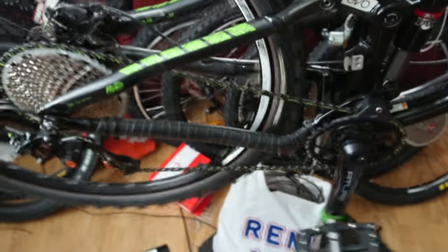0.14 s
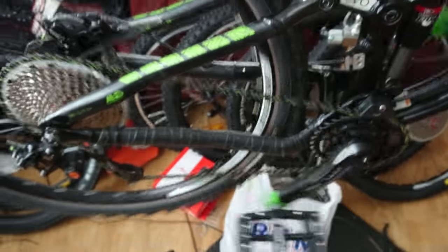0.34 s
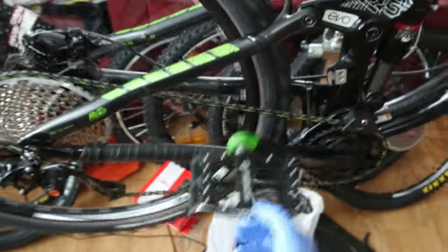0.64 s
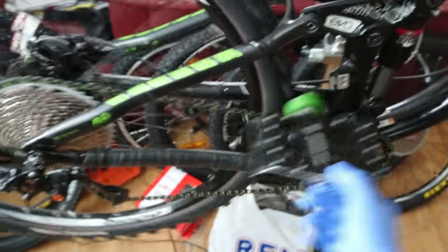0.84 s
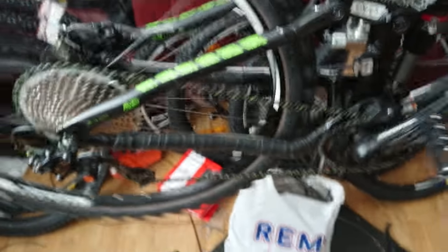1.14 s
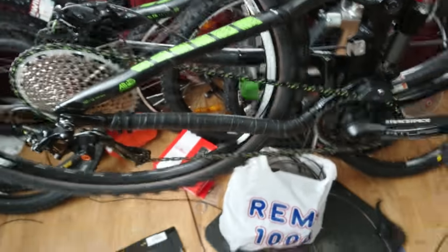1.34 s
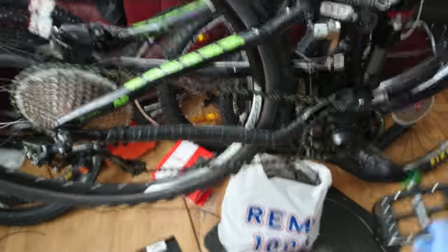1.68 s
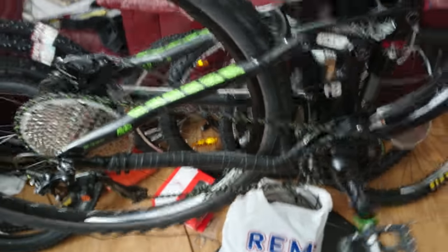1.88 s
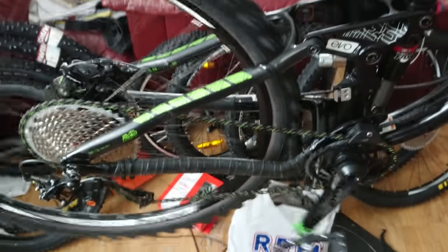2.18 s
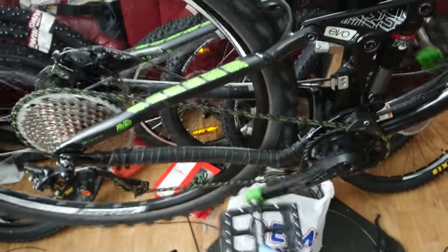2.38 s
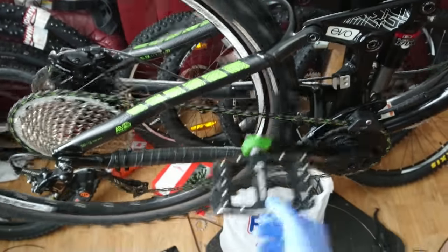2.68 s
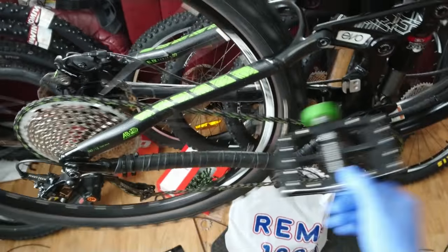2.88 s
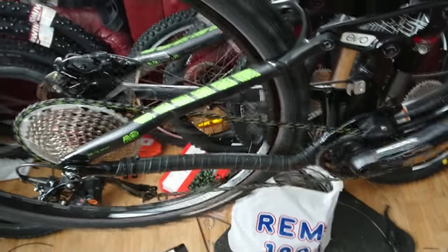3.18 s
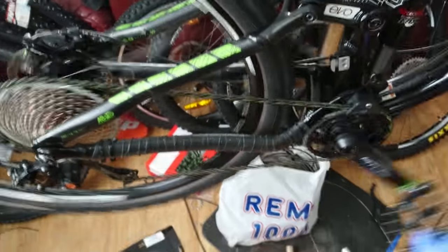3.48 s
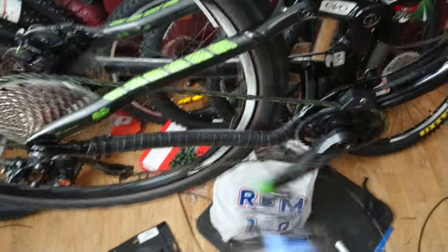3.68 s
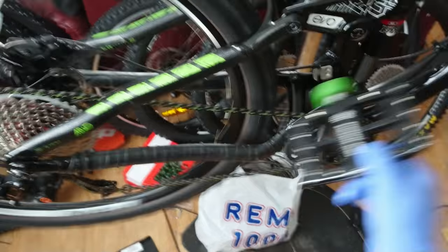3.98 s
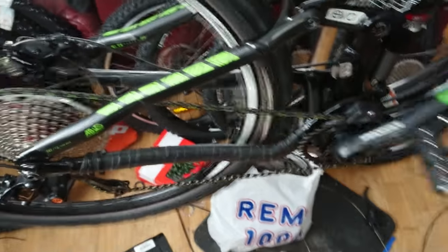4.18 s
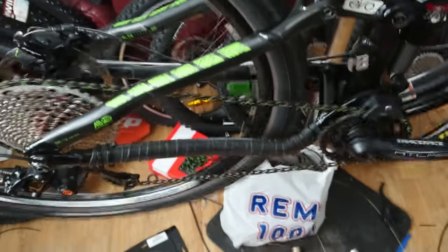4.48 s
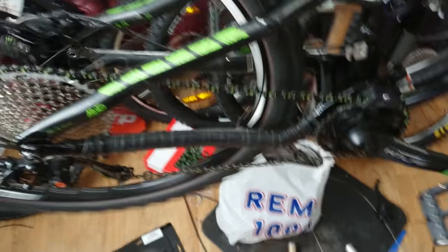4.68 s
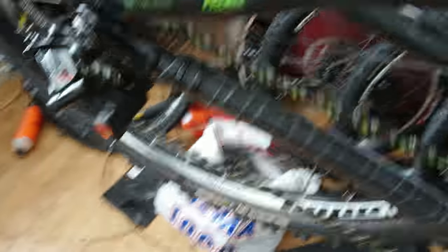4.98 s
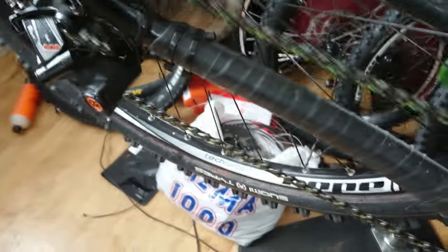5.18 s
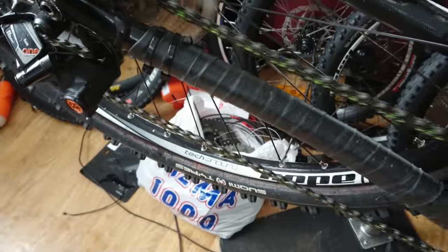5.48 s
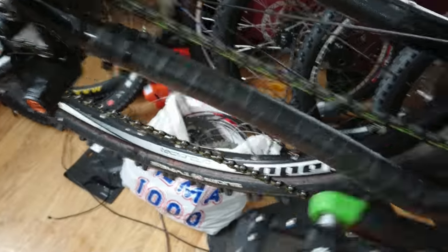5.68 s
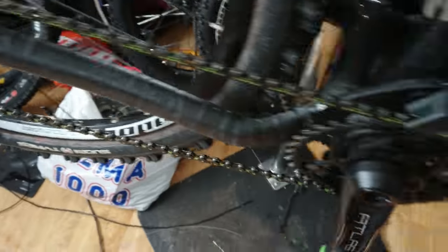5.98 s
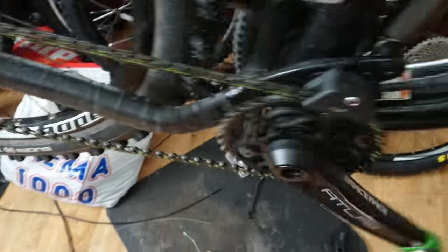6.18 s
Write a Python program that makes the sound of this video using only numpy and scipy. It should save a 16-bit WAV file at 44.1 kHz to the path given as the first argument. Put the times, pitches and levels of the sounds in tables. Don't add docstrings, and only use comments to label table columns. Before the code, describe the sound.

A bicycle freehub clicks as the crank is turned backwards by hand, quickening to a sharp rattle, then a loud close-up ratcheting buzz that squeaks and scrapes.

```python
import sys
import numpy as np
from scipy import signal
from scipy.fft import rfft, irfft
from scipy.io import wavfile
from scipy.ndimage import uniform_filter1d

SR = 44100
rng = np.random.default_rng(int(sys.argv[2]) if len(sys.argv) > 2 else 0)


def transcribe(signal):
    frames = np.atleast_2d(signal).T
    limited = np.clip(frames, -1, 1)
    pcm = np.round(limited * 32767).astype(np.int16)
    wavfile.write(sys.argv[1], SR, pcm)


def volts_from_db(level):
    exponent = np.asarray(level, float) / 20
    return 10 ** exponent


N = 279594
TIME = np.arange(N) / SR
BEFORE = TIME < 4.797

# start_s, peak_db
FIRM_SNAPS = [(0.0518, -46), (0.1876, -47.5), (0.306, -41.5), (.4045, -37.5), (0.4967, -32.5),
              (0.5748, -37.5), (.6769, -41.5), (0.7785, -43), (0.893, -44), (0.997, -33), (1.1049, -40),
              (1.2087, -44), (1.318, -42.5), (1.4316, -44), (1.543, -44.5), (1.6576, -44), (1.8054, -52.5),
              (1.955, -47), (2.1032, -43), (2.2348, -49), (2.3475, -47), (2.457, -40.5),
              (2.5745, -49), (2.6983, -44.5), (2.815, -46), (2.9223, -45), (3.027, -41), (3.1228, -37.5),
              (3.2106, -38.5), (3.2924, -37), (3.3667, -39), (3.4281, -41), (3.4885, -31.5), (3.5423, -38),
              (3.5942, -35.5), (3.6431, -43), (3.693, -29.5), (3.7409, -31), (3.7873, -33.5), (3.8342, -33),
              (3.8781, -31), (3.9249, -42), (3.9749, -31.5)]
FIRM = FIRM_SNAPS
# start_s, peak_db
NEAR_SNAPS = [(4.0518, -23.5), (4.1075, -24), (4.155, -25.5), (4.198, -24), (4.2408, -25), (4.2833, -24),
              (4.325, -23.5), (4.3677, -22.5), (4.4075, -21), (4.4496, -24), (4.4897, -23), (4.5331, -23.5),
              (4.5752, -24), (4.619, -23), (4.6634, -25), (4.7053, -21.5), (4.7453, -21.5)]
# freq_hz, density_db_per_hz
FAR = [(530, -40.5), (900, -17.5), (1280, -17.5), (1640, -9.5), (1880, -14.5), (2190, -7.5), (2790, -9),
       (3470, -6), (4150, 0.5), (7860, -21), (9420, -8.5), (11600, -24.5), (15100, -11), (16000, -14.5)]
# freq_hz, left_minus_right_db
FAR_LR = [(1200, -4), (2400, 4), (4400, 5.5), (6800, 16), (9300, -8), (12000, -6), (15000, 3.5)]
# freq_hz, density_db_per_hz
CLOSE = [(530, -34.5), (900, -22), (1130, -25.5), (1790, -16), (1990, -14), (2300, -13), (2790, -3.5),
         (3730, -7), (4570, -3.5), (7680, -18.5), (9200, -10.5), (11600, -21.5), (15100, -6), (16000, -11)]
# freq_hz, left_minus_right_db
CLOSE_LR = [(1200, -4), (2400, -12), (4400, -5.5), (6800, 11), (9300, -10.5), (12000, -2.5), (15000, 3.5)]


def far_pawls():
    notes_hz = [3960, 4730, 4260]
    return ratchet(far_snaps(), FAR, FAR_LR, notes_hz, ping_db=4.5, ping_t60_s=0.006,
                   gain_db=-5.5, snap_t60_s=0.0029, early_db=-4.0, early_s=0.001508,
                   tail_db=-11.0, tail_t60_s=0.3, treble_t60_s=0.092, scatter_db=0.34)


def far_snaps():
    # start_s, peak_db
    link_ticks = [(.1685, -53), (.2713, -45), (.594, -56), (.6978, -57), (.9228, -47), (1.1338, -41.5),
                  (1.294, -50), (1.6871, -36), (2.4259, -51), (2.7187, -63)]
    # start_s, peak_db
    hard_teeth = [(.9492, -41.5), (1.8771, -49), (2.9746, -39.5), (3.7179, -36), (3.8107, -35),
                  (3.901, -31.5), (4.0043, -30)]
    teeth = alternate(FIRM, 0.49, soft_db=-6.5, scatter_db=2.0)
    return np.vstack([voiced(teeth, -22.0, -0.27, 5.9, 0.067),
                      voiced(link_ticks, -17.0, -0.072, 3.9, 0.12),
                      voiced(hard_teeth, -22.0, -0.1, 5.1, 0.1)])


def near_pawls():
    # freq_hz, density_db_per_hz
    body = [(530, -46), (900, -15.5), (1150, -21.5), (1920, -7), (2300, -15.5), (2890, 1), (3820, -1),
            (4360, 1), (6800, -4), (8050, -12.5), (9310, -1), (11600, -11.5), (15100, -0.5), (16000, 3)]
    # freq_hz, left_minus_right_db
    balance = [(1200, -2), (2400, 3), (4400, 3.5), (6800, 12), (9300, -3), (12000, -3.5), (15000, 3.5)]
    notes_hz = [3260, 4100, 5800]
    snaps = voiced(NEAR_SNAPS, -11.5, -1.7, 7.4, -0.5)
    return ratchet(snaps, body, balance, notes_hz, ping_db=-6.0, ping_t60_s=0.0057,
                   gain_db=0, snap_t60_s=0.009, early_db=-1.1, early_s=0.0023,
                   tail_db=-10, tail_t60_s=0.32, treble_t60_s=0.2, scatter_db=0.71)


def close_pawls():
    notes_hz = [2785, 3100, 4590, 5400]
    buzz = ratchet(spinning(), CLOSE, CLOSE_LR, notes_hz, ping_db=-3.5, ping_t60_s=0.0094,
                   gain_db=-1.76, snap_t60_s=0.011, early_db=-16.0, early_s=0.001,
                   tail_db=-9, tail_t60_s=0.22, treble_t60_s=0.16, scatter_db=2.14)
    return hub_rings(buzz)


def spinning():
    # start_s, peak_db
    kick_start = [(4.9083, -27.5), (4.9431, -26), (4.9651, -22.5), (4.9821, -19), (4.9982, -24),
                  (5.0114, -16.5), (5.0247, -21), (5.0370, -16.5)]
    # start_s, peak_db
    kick_firm = [(5.049, -15.5), (5.0724, -20), (5.0908, -14.5), (5.1084, -18), (5.1266, -12.5),
                 (5.1428, -16.5), (5.1577, -11.5), (5.1738, -13), (5.1857, -14), (5.1984, -15)]
    # start_s, teeth_per_s, level_db
    spin = [(5.2, 157, -24.5), (5.258, 171, -24), (5.339, 157, -24), (5.438, 142, -24), (5.662, 128, -23.5),
            (5.762, 126, -26), (5.854, 111, -24.5), (6.039, 97, -26.5), (6.34, 97.7, -27.5)]
    s, rate, db = np.transpose(spin)
    teeth = np.cumsum(np.interp(TIME, s, rate) * (TIME > kick_firm[-1][0])) / SR
    when = TIME[1:][np.diff(np.floor(teeth)) > 0]
    jitter_s = 0.0001 * rng.standard_normal(N // 100)[:len(when)]
    when = np.clip(when + jitter_s, 0, TIME[-1])
    peak_db = np.interp(when, s, db + 7.5 - 10 * np.log10(rate / 130))
    limp_db = 0.5 * (-1.) ** np.arange(len(when))
    wobble_db = 2.5 * walk(25)[(when * SR).astype(int)]
    peak_db = peak_db + limp_db + wobble_db
    kick = np.vstack([kick_start, alternate(kick_firm, 0.55, soft_db=-2.1, scatter_db=1.2)])
    kick = voiced(kick, -9.5, -0.35, -8.0, 0.69)
    treble_db, pan_db = np.full(len(when), -7.5), np.full(len(when), -6.5)
    return np.vstack([kick, np.transpose([when, peak_db, treble_db, pan_db])])


def hub_rings(close):
    # freq_hz, width_hz, gain_db
    modes = [(2018, 18, 2.5), (2430, 14, -4.5), (2724, 49, -3), (2870, 9, 6), (3030, 10, -4),
             (3130, 21, 0.5), (4720, 37, -6.5), (4570, 33, -4.5)]
    # centre_s, level_db, length_s
    squeaks = [(5.2, -22, .03), (5.338, -12, 0.033), (5.7, -2.5, 0.089), (5.8, 6.5, 0.029)]
    # centre_s, level_db, length_s
    scrapes = [(5.92, 4.9, 0.032), (6.1, 9.9, 0.082), (6.3, 2.42, 0.072)]
    shell = sum(volts_from_db(db + 3.5 + 3.4 * walk(12)) * ring(close, hz, width) for hz, width, db in modes)
    squeak = bumps(squeaks) * ring(close, 5340, 598)
    scrape = bumps(scrapes) * ring(ring(close, 2840, 69.9), 2840, 70)
    return close + shell + squeak + scrape


def ratchet(snaps, body, balance, notes_hz, ping_db, ping_t60_s, gain_db, snap_t60_s, early_db, early_s,
            tail_db, tail_t60_s, treble_t60_s, scatter_db):
    s, db, treble_db, pan_db = np.transpose(snaps)
    chance = rng.standard_normal((len(s), 4)).T
    late = s + early_s * np.abs(1 + 0.34 * chance[1])
    at = (s * SR).astype(int)
    late_at = np.minimum(late * SR, N - 1).astype(int)
    ping = pings(late, db + ping_db, notes_hz, ping_t60_s)
    bass, treble = [signal.butter(4, 8000, kind, fs=SR, output="sos") for kind in ("low", "high")]
    bands = ((bass, 0, tail_t60_s), (treble, treble_db - treble_db.mean(), treble_t60_s))
    cracks, tails, out = pair(0.27), pair(0.1), []
    for ear, side in enumerate((1, -1)):
        sound = 0
        ear_db = scatter_db * chance[2 + ear]
        for sos, shift_db, t60 in bands:
            kick_db = db + gain_db + shift_db + side * (pan_db - pan_db.mean()) / 2
            kicks, hard = np.zeros(N), np.zeros(N)
            np.add.at(kicks, at, volts_from_db(2 * kick_db - 0.5 * (db - db.mean())))
            np.add.at(hard, at, volts_from_db(2 * (kick_db + early_db + 2 * scatter_db * chance[0])))
            np.add.at(hard, late_at, volts_from_db(2 * (kick_db + ear_db)))
            crack = fading(hard, snap_t60_s) * cracks[ear]
            decay = np.hypot(fading(kicks, t60), volts_from_db(-0.5) * fading(kicks, t60 / 5))
            tail = volts_from_db(tail_db) * decay * tails[ear]
            sound = sound + signal.sosfilt(sos, crack + tail)
        sound = colour(sound, body, balance, side) + ping(side * pan_db / 2 + ear_db)
        lag = 11 * (1 - ear)
        out.append(np.pad(sound, (lag, 0))[:N])
    return np.array(out)


def pings(when, db, notes_hz, t60_s):
    chance = rng.random((len(when), 2)).T
    hz = np.array(notes_hz)[(chance[0] * len(notes_hz)).astype(int)]
    hz = hz * (1 + 0.12 * (chance[1] - 0.5))
    age = np.arange(int(0.012 * SR)) / SR
    rise = 1 - np.exp(-age / 0.0003)
    shape = np.sin(2 * np.pi * hz[:, None] * age) * volts_from_db(-60 * age / t60_s) * rise
    at = (when * SR).astype(int)[:, None] + np.arange(len(age))

    def render(shift_db):
        rung = volts_from_db(db + shift_db)[:, None] * shape
        return np.bincount(at.ravel(), rung.ravel(), 2 * N)[:N]
    return render


def alternate(firm, share, soft_db, scatter_db):
    s, db = np.transpose(firm)
    soft = (db[1:] + db[:-1]) / 2 + soft_db + scatter_db * rng.standard_normal(len(s) - 1)
    rows = np.vstack([firm, np.transpose([s[:-1] + share * np.diff(s), soft])])
    return rows[np.argsort(rows[:, 0])]


def voiced(rows, treble_db, treble_slope, pan_db, pan_slope):
    s, db = np.transpose(rows)
    above = db - uniform_filter1d(db, size=7)
    chance = rng.standard_normal((len(s), 2)).T
    treble = treble_db + treble_slope * above + 1.5 * chance[0]
    pan = pan_db + pan_slope * above + 1.5 * chance[1]
    return np.transpose([s, db, treble, pan])


def efforts():
    # start_s, level_db
    push = [(0.0, -72), (.44, -63), (.83, -64), (1.34, -66), (1.8, -73), (2.46, -70), (2.94, -68),
            (3.28, -64), (3.61, -59), (3.99, -54.5), (4.11, -63), (4.4, -66.5), (4.75, -71), (4.9, -75.5),
            (5.08, -66), (5.25, -54.5), (6.1, -59.5), (6.34, -60.5)]
    # centre_s, rumble_db, length_s
    grips = [(.4, -62.5, 0.34), (1.17, -70.5, 0.36), (1.52, -65, 0.16), (2.2, -75.5, 0.82),
             (3.65, -67, 0.14), (3.97, -69, 0.087), (4.25, -68, 0.045), (4.5, -71.5, 0.17),
             (5.0, -68, 0.064)]
    push_db = np.interp(TIME, *np.transpose(push))
    firm, near = np.array(FIRM)[:, 0], np.array(NEAR_SNAPS)[:, 0]
    teeth_per_s = np.r_[2 / np.diff(firm), 1 / np.diff(near)]
    speed = np.interp(TIME, np.r_[firm[1:], near[1:]], teeth_per_s)
    far_db = -60 + 2.44 * 20 * np.log10(speed / 18) + 11.5 * (TIME > 4.05)
    close_db = -26.5 + 2.05 * (push_db + 57.5)
    crunch_db = np.where(BEFORE, far_db, close_db)
    rumble = bumps(grips) + np.where(BEFORE, volts_from_db(-80), volts_from_db(push_db + 2))
    return crunch_db, push_db, 20 * np.log10(rumble)


def chain(crunch_db, drum_db):
    # freq_hz, width_hz, gain_db
    tubes = [(385, 50, -11), (464, 21, -11), (645, 7.1, 10), (890, 240, -20)]
    crunch = fading(grit(900, 1.3) ** 2, 0.036) * pair(0.082)

    def heard(body, balance, level_db):
        left = colour(crunch[0], body, balance, 0.74)
        right = colour(crunch[1], body, balance, -1.5)
        return level(np.array([left, right]), level_db)
    crunch = np.where(BEFORE, heard(FAR, FAR_LR, -6), heard(CLOSE, CLOSE_LR, -9))
    jolts = fading(grit(300, 0.59) ** 2, 0.071) * pair(0.35)
    drum = sum(volts_from_db(db) * ring(jolts, hz, width) for hz, width, db in tubes)
    drum = drum + volts_from_db(2) * ring(ring(jolts, 482, 450), 482, 450)
    return crunch * volts_from_db(crunch_db) + level(drum, 0.31) * volts_from_db(drum_db + np.array([[-3], [3]]))


def grit(per_s, spread_db):
    return (rng.random(N) < per_s / SR) * volts_from_db(spread_db * np.minimum(rng.exponential(1, N), 4))


def handling(rumble_db):
    # freq_hz, density_db_per_hz
    far_rumble = [(18, -27), (30, -18), (59, 1), (91, -1.5), (124, -1.5), (227, -7), (300, -17.5),
                  (390, -26), (660, -120)]
    # freq_hz, density_db_per_hz
    close_rumble = [(18, -47), (30, -10), (65, -4.5), (177, -7), (216, 2), (300, -5), (390, -44),
                    (660, -120)]
    # start_s, peak_db, pitch_hz, t60_s
    knocks = [(0.284, -53.5, 440, 0.1), (0.522, -45, 125, 0.05), (0.52, -45.5, 398, 0.039),
              (0.567, -52, 532, 0.16), (0.599, -47.5, 396, 0.15), (0.634, -52.5, 475, 0.19),
              (.68, -58.5, 430, 0.15), (.58, -53.5, 245, 0.18), (0.624, -49, 55, 0.42),
              (.73, -48.5, 60, 0.18), (1.361, -44, 118, 0.093), (1.69, -59, 486, 0.035),
              (1.487, -51, 184, 0.06), (1.508, -53, 198, 0.087), (1.529, -60, 180, 0.065),
              (1.555, -55, 149, 0.068), (2.499, -59, 385, 0.33), (2.551, -51, 52.6, 0.39),
              (3.4, -52, 126, 0.08), (4.744, -33.5, 507, 0.0021), (4.997, -51, 97, 0.29),
              (6.049, -44, 667.5, 0.079), (6.255, -41.5, 645, 0.11), (6.253, -49.5, 195.2, 0.16)]
    far, close = (level(np.array([colour(n, p + [(700, -70)]) for n in pair(0.52)]), 0)
                  for p in (far_rumble, close_rumble))
    rumble = np.where(BEFORE, far, close) * volts_from_db(rumble_db - 2.5 + 2.0 * walk(17))
    thuds = np.zeros(N)
    for s, db, hz, t60 in knocks:
        first = int(s * SR) + 1
        span = slice(first, first + SR // 2)
        cycles = hz * (TIME[span] - s)
        sag = 0.42 * (1 - np.exp(-cycles / 0.34)) * (hz > 80)
        swell = 1 - np.exp(-cycles / 0.5) * (hz < 80)
        decay = volts_from_db(db + 2.5 - 60 * cycles / hz / t60)
        thuds[span] += swell * decay * np.sin(2 * np.pi * (cycles + sag))
    return (rumble + thuds * volts_from_db(1.4 * walk(50))) * volts_from_db(np.array([[-6], [3]]))


def hub_whine():
    low = level(ring(pair(0.3), 1220, 220), -64)
    high = level(ring(pair(0.25), 4600, 250), -68)
    return (low + high) * ~BEFORE


def workshop():
    # freq_hz, density_db_per_hz
    spectrum = [(24, -13), (40, 6), (124, -33), (226, -18), (646, -2), (1810, -3.5), (2210, 1), (2840, -5),
                (4240, -6), (8130, -33), (9690, -23), (11300, -46), (16000, -24)]
    hiss = level(np.array([colour(n, spectrum) for n in pair(0.16)]), -68.5)
    return hiss + level(ring(pair(0.59), 125.8, 9.6), -83.5)


def level(x, db):
    return x * volts_from_db(db) / np.sqrt(np.mean(x ** 2))


def colour(x, points, tilt=((1, 0), (2, 0)), side=0):
    size = 4096
    log_hz = np.log(np.arange(size // 2 + 1) * SR / size + 1)

    def curve(rows):
        hz, db = np.transpose(rows)
        return np.interp(log_hz, np.log(hz), db)
    plain_db = curve(points)
    cepstrum = irfft(np.log(volts_from_db(plain_db + side / 2 * curve(tilt))))
    cepstrum[1:size // 2] *= 2
    response = irfft(np.exp(rfft(cepstrum[:size // 2], size)))
    plain_rms = np.sqrt(np.mean(volts_from_db(2 * plain_db)))
    return signal.fftconvolve(x, response / plain_rms)[:N]


def ring(x, hz, width):
    return signal.lfilter(*signal.iirpeak(hz, hz / width, SR), x)


def fading(power, t60_s):
    return np.sqrt(signal.lfilter([1], [1, -volts_from_db(-120 / (t60_s * SR))], power))


def pair(likeness):
    mid, side = rng.standard_normal((2, N))
    c = np.clip(likeness, 0, 1)
    return (np.sqrt(1 + c) * mid + np.sqrt(1 - c) * side * np.array([[1], [-1]])) / np.sqrt(2)


def walk(per_s):
    knots = rng.standard_normal(int(per_s * N / SR) + 2)
    return np.interp(TIME * per_s, np.arange(len(knots)), knots)


def bumps(rows):
    return sum(volts_from_db(db) * np.exp(-((TIME - s) / length) ** 2) for s, db, length in rows)


def scene():
    crunch_db, drum_db, rumble_db = efforts()
    pawls = (far_pawls() + near_pawls()) * BEFORE + close_pawls()
    return pawls + chain(crunch_db, drum_db) + handling(rumble_db) + hub_whine() + workshop()


def low_pass(x):
    return signal.sosfilt(signal.butter(12, 17010, fs=SR, output="sos"), x)


def record(dry):
    # start_s, gain_db
    fade = [(4.747, 1), (4.752, -17), (4.775, -61), (4.792, -45), (4.795, -99), (4.801, -92), (4.801, -19),
            (4.9, -6), (4.907, -1)]
    s, db = np.transpose(fade)
    mix = signal.sosfilt(signal.butter(2, 40, "high", fs=SR, output="sos"), dry)
    mix = signal.sosfilt(signal.ellip(8, 0.2, 48, 15750, fs=SR, output="sos"), mix)
    mix = mix * volts_from_db(np.interp(TIME, s, db))
    return low_pass(mix)


dry = scene()
out = record(dry)
transcribe(out)
```